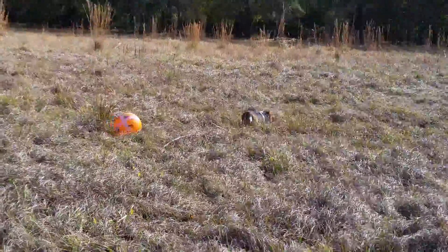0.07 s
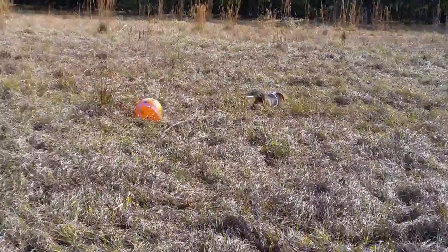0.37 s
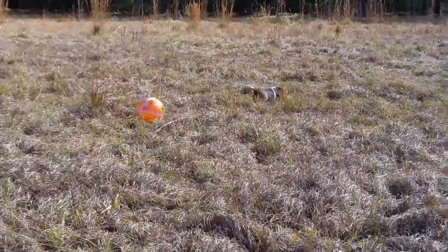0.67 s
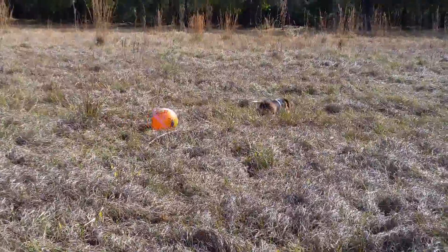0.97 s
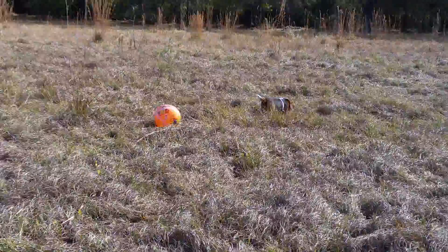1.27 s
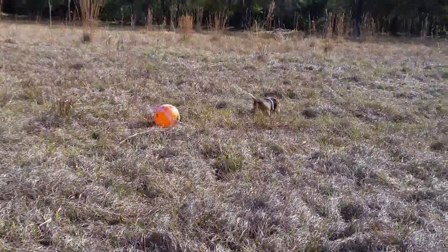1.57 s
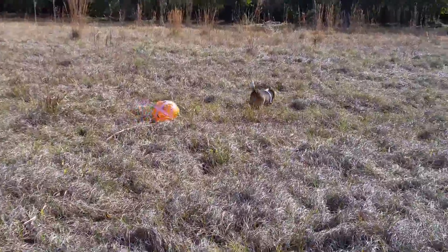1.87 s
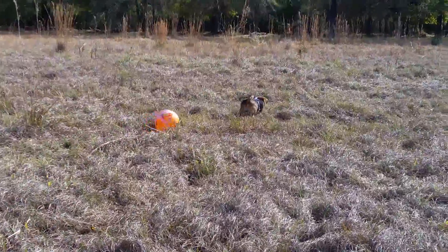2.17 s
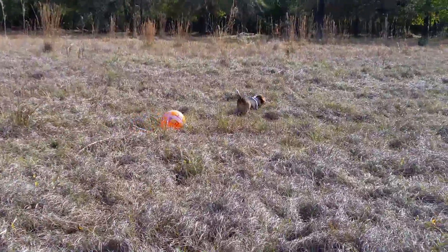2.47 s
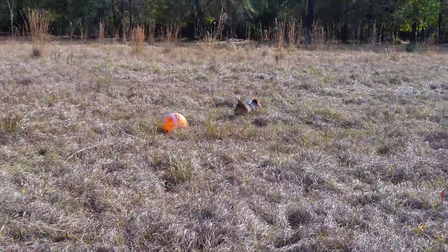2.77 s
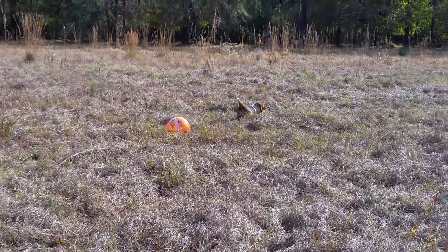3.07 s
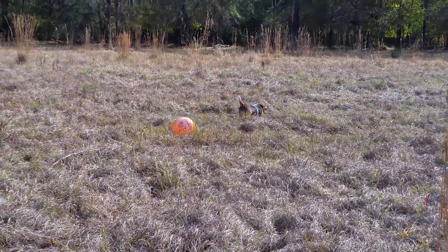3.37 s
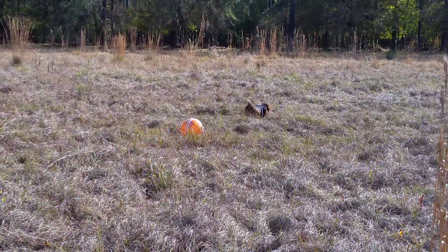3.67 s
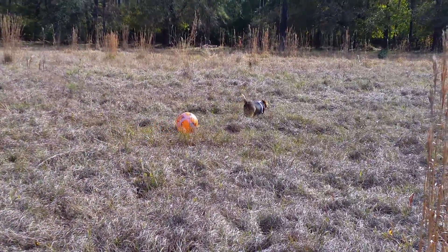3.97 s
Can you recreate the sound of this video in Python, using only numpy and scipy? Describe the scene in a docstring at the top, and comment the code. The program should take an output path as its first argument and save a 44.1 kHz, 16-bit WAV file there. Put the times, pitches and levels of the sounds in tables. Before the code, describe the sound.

Handling noise: skin slides and ticks against a microphone, then fades into faint outdoor rumble.

```python
"""A hand slides over the body of a small camera in a quiet, open field of dry grass.
Friction, a stream of tiny slips of skin, excites the resonances of two microphone ports (a hiss)
and of the case (a scrape); where the skin catches and lets go, it ticks. Knocks, one early and a close
pair later, set the case ringing in its modes, and it flexes under the grip.
Behind the hand lie a low outdoor rumble and a faint microphone hiss."""
import sys
import numpy as np
from scipy import signal
from scipy.io import wavfile
from scipy.ndimage import uniform_filter1d

SR = 44100
rng = np.random.default_rng(int(sys.argv[2]) if len(sys.argv) > 2 else 0)


def generate_wav(sig):
    """Save sig (samples, or channels by samples) to the path in sys.argv[1] as 16-bit PCM at SR."""
    pcm = np.round(np.clip(np.atleast_2d(sig).T, -1, 1) * 32767).astype(np.int16)
    wavfile.write(sys.argv[1], SR, pcm)


N = 176400
T = np.arange(N) / SR

# Friction of the sliding hand, in relative levels: time_s, hiss_db, scrape_db, hiss_left_minus_right_db
SLIDE_LEVELS = [(0, -40, -55, -4.5), (.04, -38, -53, -8), (.095, -42, -57.5, -8), (.19, -47, -55.5, -3.5),
                (.275, -47.5, -51.5, -3), (.315, -45.5, -54.5, -3.5), (.4, -46.5, -55, -4),
                (.5, -49, -58.5, -2), (.6, -56.5, -65, 1), (.645, -50.5, -62, -6.5), (.69, -44.5, -61, -11),
                (.77, -44.5, -56, -6.5), (.88, -42.5, -57.5, -9), (1.04, -38, -54, -7.5),
                (1.17, -39.5, -53, -6), (1.4, -48, -62, -3.5), (1.5, -49.5, -63.5, -3),
                (1.66, -45, -59, -8.5), (1.77, -48, -63, -5.5), (1.92, -57.5, -71.5, -1),
                (2.2, -67.5, -80, 1), (2.27, -60, -78, -7), (2.39, -60.5, -78.5, -5.5),
                (2.44, -60.5, -74, -4), (2.48, -62.5, -77.5, -4), (2.52, -63.5, -77, 1),
                (2.74, -79, -87, 1.5), (4, -81.5, -100, -2)]


def skin_hiss():
    """Friction noise: countless slips drive the ports, and faster sliding broadens the spectrum."""
    # Gain of the top treble, a brief sizzle after the late knocks: time_s, gain_db
    sizzle = [(1.8, -1), (2.1, -5.5), (2.43, 2), (2.477, 8), (2.52, -2), (2.65, 4)]
    grains_per_s, grain_db, flicker_db = 1500, -5.5, 1.14
    skirt_db_per_db, neutral_db = 0.74, -48.5
    hiss_db, _, pan_db = curve(SLIDE_LEVELS)
    grain_onsets = rng.random(N) < grains_per_s / SR
    slips = rng.standard_normal((2, N))
    slips += amp(grain_db) * unit_rms(grain_onsets * rng.standard_normal((2, N)))
    flicker = unit_rms(uniform_filter1d(rng.standard_normal(N), size=700))
    drive = slips * amp(hiss_db + 3.5 + flicker_db * flicker)
    drive[0] *= amp(pan_db)
    hiss = scale_skirts(port_resonance(drive), skirt_db_per_db * (hiss_db - neutral_db))
    return scale_band(hiss, 12200, "high", sizzle)


def case_scrape():
    """Structure-borne sound: friction noise passes through the case, which favours the lower frequencies."""
    # Spectrum of the scrape: frequency_hz, density_db
    spectrum = [(30, 6.5), (75, 7.5), (160, -3.5), (260, 6.5), (480, 2), (700, 3), (1000, 0.5), (1600, 2),
                (2400, -1.5), (3000, -7), (4200, -12), (6000, -30.5), (9000, -67.5)]
    # Likeness of the scrape at the two ports: frequency_hz, correlation
    coherence = [(60, 0.77), (300, 0.65), (700, 0.64), (1400, 0.12), (3100, 0), (7000, 0)]
    # Leftward drift of the fading scrape: time_s, left_minus_right_db
    drift = [(1.7, 0.5), (2.15, 5)]
    # Hollow middle band, strong at first touch, dipping, then swelling again later: time_s, gain_db
    hollow_gain = [(.05, 5), (.25, -3), (.8, -3), (1.3, 1), (1.75, 4), (2.4, 2)]
    # Upper edge of the scrape: time_s, gain_db
    upper_gain = [(.05, 4), (.2, -5.5), (.55, -3), (.72, -3), (.85, 3.5), (1.15, 1.5), (1.7, 2), (2.4, 3.5)]
    _, scrape_db, _ = curve(SLIDE_LEVELS)
    shift_db = curve(drift)[0] / 2
    scrape = noise(spectrum, coherence, patch_db=1.5) * amp(scrape_db + 2.5) * amp([shift_db, -shift_db])
    scrape = scale_band(scrape, (398, 955), "band", hollow_gain)
    return scale_band(scrape, (2843, 6580), "band", upper_gain)


def skin_ticks():
    """Stick-slip: each catch of the skin releases in one snap and a fast-decaying burst of smaller slips."""
    # Catches, in relative levels: start_s, hiss_db, crack_db, edge_db, hiss_pan_db, crack_low_cut_hz
    catches = [(.0292, -16, -28, -37, -12, 150), (.0355, -26, -35, -40, -10, 150),
               (.0725, -18.5, -39, -38, -13, 300), (.1100, -18.5, -38, -18.5, -14, 1400),
               (.1500, -12.5, -29, -15, -18, 100), (.1508, -18, -30, -18, -16, 100),
               (.3245, -31, -60, -46, -9, 1000), (.8138, -21, -60, -44, -14, 1000),
               (.8411, -15.5, -31, -22, -17, 1600), (1.2214, -21, -45, -46, -17, 1000),
               (1.2961, -25, -60, -44, -11, 1000), (1.334, -24.5, -52, -38, -13, 1000),
               (1.4438, -20.5, -48, -32, -13, 1500), (1.650, -28, -52, -50, -15, 1000),
               (2.369, -31.5, -75, -70, -14, 1000), (3.496, -68, -82, -50, 8, 1000)]
    # Spectrum of the low crack: frequency_hz, density_db
    crack_spectrum = [(100, -12), (400, 6), (1000, 10), (1500, 6), (2100, 9), (3000, -4), (4100, 6),
                      (5500, -15), (8000, -6), (12000, -10)]
    # Spectrum of the bright edge of a sharp catch: frequency_hz, density_db
    edge_spectrum = [(3000, -72), (6000, -26), (8000, -16), (11000, 1), (13500, 5), (16000, 4)]
    snap, burst_decay_s, tail_decay_s = 3, .0004, .003
    t = np.arange(900) / SR
    envelope = amp(-8) * np.exp(-t / burst_decay_s) + amp(-20) * np.exp(-t / tail_decay_s)
    hiss, crack, edge = np.zeros((3, 2, N))
    for start_s, hiss_db, crack_db, edge_db, pan_db, low_cut_hz in catches:
        bursts = np.where(t == 0, snap, envelope * rng.choice([-1, 1], (3, 2, len(t))))
        add(hiss, start_s, bursts[0] * amp([[hiss_db + pan_db], [hiss_db]]))
        add(crack, start_s, slope(bursts[1], low_cut_hz, "high") * amp(crack_db))
        add(edge, start_s, bursts[2] * amp(edge_db))
    ticks = scale_skirts(port_resonance(hiss), gain_db=-10)
    for side in range(2):
        ticks[side] += colour(crack[side], crack_spectrum) + colour(edge[side], edge_spectrum)
    return ticks


def port_resonance(drive):
    """Resonance: each microphone port rings at its own peak in the high treble."""
    # Response of the left port: frequency_hz, relative_gain_db
    left_response = [(2500, -49), (3600, -32), (5300, -20), (6200, -26.5), (7600, -33.5), (8800, -19.5),
                     (10000, -17.5), (10900, -9), (12100, -2.5), (13000, -7.5), (14000, -9.5),
                     (15700, -5.5)]
    # Response of the right port: frequency_hz, relative_gain_db
    right_response = [(2500, -55.5), (4000, -28.5), (5800, -35), (7600, -35), (8800, -30.5), (10000, -9),
                      (10700, 0.5), (11400, 5), (12300, 2.5), (13300, -5.5), (14500, -7), (15700, -26.5)]
    return np.array([colour(drive[0], left_response), colour(drive[1], right_response)])


def scale_skirts(sound, gain_db):
    """Bandwidth: gain on either side of the port resonance widens or narrows its peak."""
    skirts = band(sound, 13500, "high") + band(sound, (6340, 10320), "band")
    return sound + skirts * (amp(gain_db) - 1)


def case_knocks():
    """Impact: a push and rebound rock the case and its damped modes ring; longer contact is duller."""
    # Knocks, in relative levels: start_s, push_db, contact_s, right_offset_db, ring_db, clack_db
    impacts = [(.1697, -22.5, .0003, 1.5, -45.5, -21.5), (2.4449, -30.5, .00075, -9, -57, -41),
               (2.4692, -46, .0008, -3, -66, -60)]
    # Modes of the case: pitch_hz, level_db, t60_s
    modes = [(231.4, 3, 0.91), (253.4, 7.5, 0.052), (85, 10.5, 0.026), (452, -0.5, 0.095), (554, -14, 0.51)]
    # Spectrum of the clack of hard contact: frequency_hz, density_db
    clack_spectrum = [(200, -8), (430, 0), (700, -10), (1050, 1), (1500, -4), (2400, -9), (3200, -18),
                      (4200, -32), (8000, -50)]
    left_lag_s, rebound_delay_s, rebound_gain = .0009, .003, .38
    ring_right_db, shell_right_db = -20.5, 0.5
    knocks, t = np.zeros((2, N)), np.arange(SR) / SR
    ring = sum(damped_mode(t, *mode) for mode in modes)
    shell = damped_mode(t, pitch_hz=445, level_db=-12, t60_s=.022)  # boxy note of the stiff shell
    hard_clack = colour(1. * (t == 0), clack_spectrum) * amp(8)
    for start_s, push_db, contact_s, right_db, ring_db, clack_db in impacts:
        peak_s, rebound_width_s = start_s + contact_s, contact_s + .0011
        right = amp(right_db) * pulse(peak_s, contact_s)
        right -= rebound_gain * pulse(peak_s + rebound_delay_s + contact_s, rebound_width_s)
        # At the left port the pressure dips first and the push arrives later.
        left = -.65 * pulse(peak_s + left_lag_s / 3, contact_s)
        left += .85 * pulse(peak_s + left_lag_s + contact_s, width_s=.0008)
        left -= rebound_gain * pulse(peak_s + 2 * left_lag_s + rebound_delay_s, rebound_width_s)
        knocks += amp(push_db) * np.array([left, right])
        clack = slope(hard_clack, .85 / contact_s, "low") * amp(clack_db)
        add(knocks, start_s + contact_s / 2, clack * np.array([[0], [1]]))
        add(knocks, peak_s + left_lag_s / 2, clack * np.array([[1], [0]]))
        add(knocks, peak_s + left_lag_s, shell * amp([[push_db], [push_db + right_db + shell_right_db]]))
        add(knocks, start_s + rebound_delay_s, -ring * amp([[ring_db], [ring_db + ring_right_db]]))
    return knocks


def case_flexes():
    """Elastic deflection: each time the case gives, the pressure swings once at the left port."""
    # Flexes under the grip: centre_s, level_db, half_period_s
    flexes = [(.350, -38, .001), (1.3604, -38, .0011), (1.5099, -37, .0011), (2.382, -48, .0015)]
    swings = np.zeros((2, N))
    for centre_s, level_db, half_s in flexes:
        swings[0] += amp(level_db) * (pulse(centre_s - half_s, half_s) - pulse(centre_s + half_s, half_s))
    return swings


def outdoor_rumble():
    """Ambient noise: the open air rumbles, most coherent between the ports at long wavelengths."""
    # Spectrum of the rumble: frequency_hz, density_db
    spectrum = [(15, -23.5), (30, -14), (50, 1.5), (75, 6.5), (105, -10), (135, -3.5), (180, -12),
                (280, -17.5), (450, -20), (900, -35.5), (2000, -40.5), (5000, -57)]
    # Slow swell of the rumble: time_s, level_db
    swell = [(0, -54.5), (.6, -54), (1.1, -54.5), (1.62, -52), (2.1, -61), (2.5, -56), (2.8, -62.5),
             (3.35, -60.5), (3.6, -59.5), (4, -61)]
    # Likeness of the rumble at the two ports: frequency_hz, correlation
    coherence = [(30, 1), (70, 0.93), (130, 0.5), (290, 0.21), (640, 0.0098), (1400, 0)]
    return noise(spectrum, coherence, patch_db=1.5) * amp(curve(swell)[0])


def microphone_hiss():
    """Self-noise: each microphone hisses faintly and independently; the treble wavers near the end."""
    # Spectrum of the hiss: frequency_hz, density_db
    spectrum = [(300, -13.5), (1200, -20.5), (2200, -5.5), (3200, -13.5), (4600, -14.5), (5400, -3.5),
                (6200, -18.5), (9300, -19.5), (10400, 1.5), (11700, 14), (12600, 2.5), (13600, -7),
                (15700, -6.5)]
    # Balance of the hiss: frequency_hz, left_minus_right_db
    balance = [(500, 28), (5000, 10), (9000, -0.5), (11500, -6.5), (14000, -5)]
    # Wavering of the treble: time_s, gain_db
    treble_gain = [(2.79, -2.5), (2.87, 1), (2.98, 1.5), (3.07, -3.5), (3.17, 2.5), (3.27, -3), (3.37, 1.5),
                   (3.58, 1), (3.68, 4), (3.8, -1)]
    return scale_band(noise(spectrum, balance=balance) * amp(-72), 8000, "high", treble_gain)


def amp(db):
    """Amplitude ratio of a level in decibels."""
    return 10 ** (np.asarray(db) / 20)


def unit_rms(x):
    """Normalisation to unit mean power."""
    return x / np.sqrt(np.mean(x ** 2) + 1e-20)


def at_frequency(points, hz):
    """Interpolation of a spectrum on a log-frequency axis."""
    points_hz, values = np.transpose(points)
    return np.interp(np.log(hz + 1), np.log(points_hz + 1), values)


def curve(table):
    """Linear interpolation of each column of a time table at every sample."""
    times_s, *columns = np.transpose(table)
    return [np.interp(T, times_s, column) for column in columns]


def add(mix, start_s, sound):
    """Superposition of a stereo sound on the mix."""
    part = mix[:, max(round(start_s * SR), 0):][:, :sound.shape[1]]
    part += sound[:, :part.shape[1]]


def pulse(centre_s, width_s):
    """A Gaussian pulse of pressure."""
    return np.exp(-np.minimum(((T - centre_s) / width_s) ** 2, 50))


def damped_mode(t, pitch_hz, level_db, t60_s):
    """Free vibration: a sinusoid that decays exponentially."""
    return amp(level_db - 60 * t / t60_s) * np.sin(2 * np.pi * pitch_hz * t)


def colour(x, spectrum, size=4096):
    """Minimum-phase filtering with unit energy and the given spectral shape."""
    log_gain = np.log(amp(at_frequency(spectrum, abs(np.fft.fftfreq(size, 1 / SR)))))
    response = np.exp(np.conj(signal.hilbert(log_gain)))
    taps = np.fft.ifft(response).real[:size // 2]
    return signal.oaconvolve(x, taps / np.linalg.norm(taps))[:len(x)]


def noise(spectrum, coherence=((1, 0),), balance=((1, 0),), patch_db=0, size=1024, hop=256):
    """Partly coherent stereo noise of unit rms; its level varies in patches of time and frequency."""
    hz = np.fft.rfftfreq(size, 1 / SR)
    a, b, c, d, patches = rng.standard_normal((5, N // hop + 5, len(hz)))
    patches = uniform_filter1d(patches, size=8, axis=0)
    patches = unit_rms(uniform_filter1d(patches, size=12, axis=1))
    correlation = np.clip(at_frequency(coherence, hz), -1, 1)
    left, independent = a + 1j * b, c + 1j * d
    right = correlation * left + np.sqrt(1 - correlation ** 2) * independent
    tilt = amp(at_frequency(balance, hz) / 2)
    frames = np.array([left * tilt, right / tilt]) * amp(at_frequency(spectrum, hz) + patch_db * patches)
    _, sound = signal.istft(frames.swapaxes(-1, -2), nperseg=size, noverlap=size - hop)
    return unit_rms(sound[:, :N])


def band(x, hz, kind):
    """Zero-phase filtering: the band stays in phase with the whole sound."""
    return signal.sosfiltfilt(signal.butter(4, hz, kind, fs=SR, output="sos"), x)


def scale_band(x, hz, kind, gain_table):
    """Time-varying equalisation: one band follows a table of gains in decibels."""
    return x + band(x, hz, kind) * (amp(curve(gain_table)[0]) - 1)


def slope(x, hz, kind):
    """Causal second-order high-pass or low-pass filtering."""
    return signal.sosfilt(signal.butter(2, hz, kind, fs=SR, output="sos"), x)


def scene():
    """Superposition of the hand's sounds and the quiet background."""
    hand = skin_hiss() + case_scrape() + skin_ticks() + case_knocks() + case_flexes()
    return hand + outdoor_rumble() + microphone_hiss()


def record(dry):
    """Band limiting: the recorder cuts the deepest bass gently and the highest treble steeply."""
    low_cut_hz, high_cut_hz = 40, 16050
    low_pass = signal.firwin(511, high_cut_hz, window=("kaiser", 9), fs=SR)
    return signal.oaconvolve(slope(dry, low_cut_hz, "high"), low_pass[None], "same")


dry = scene()
out = record(dry)
generate_wav(out)
```